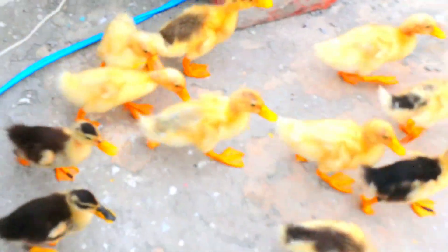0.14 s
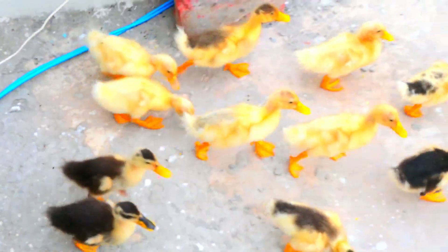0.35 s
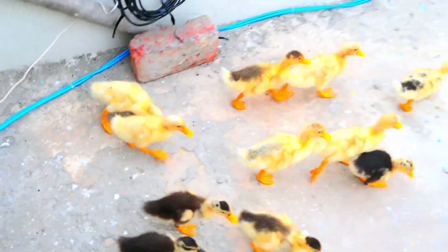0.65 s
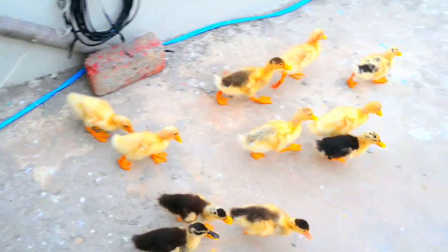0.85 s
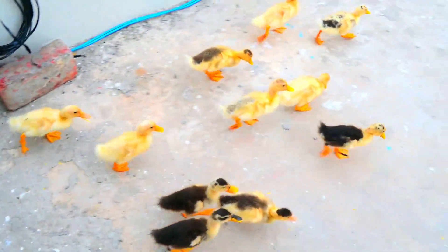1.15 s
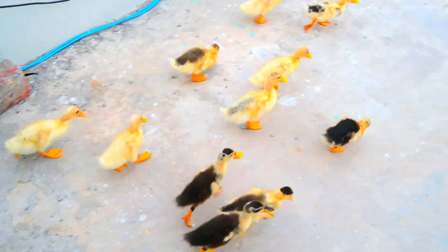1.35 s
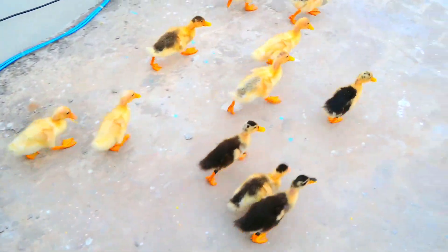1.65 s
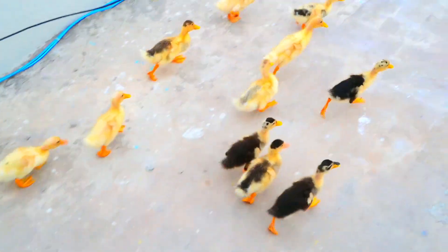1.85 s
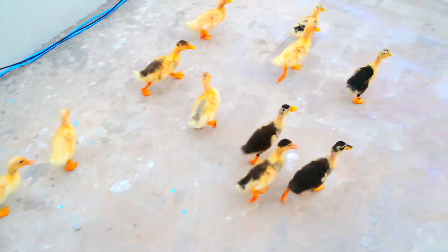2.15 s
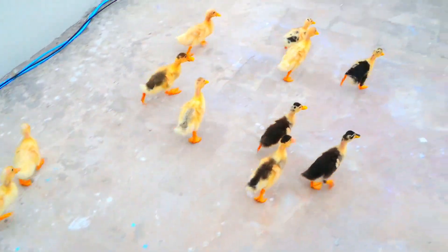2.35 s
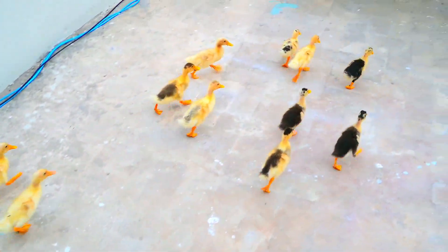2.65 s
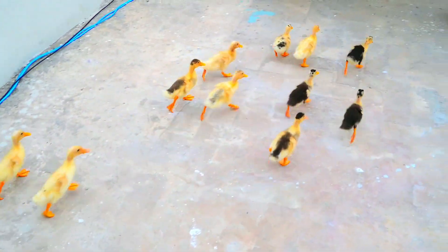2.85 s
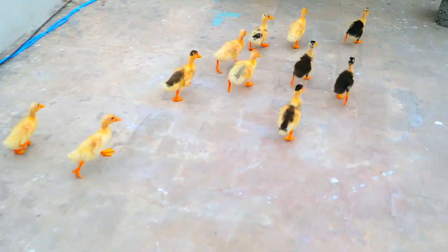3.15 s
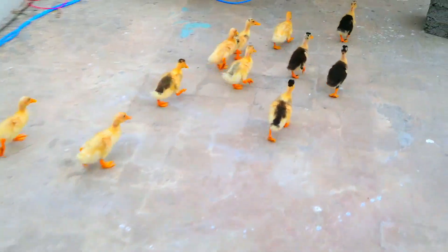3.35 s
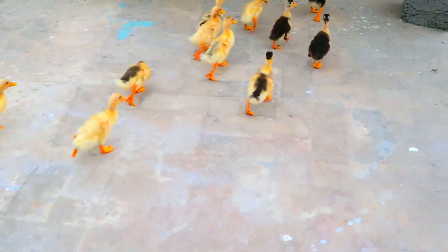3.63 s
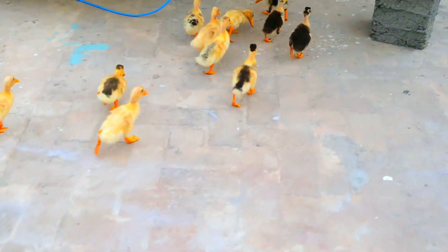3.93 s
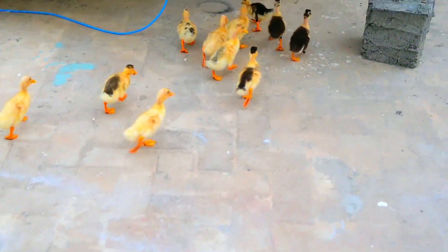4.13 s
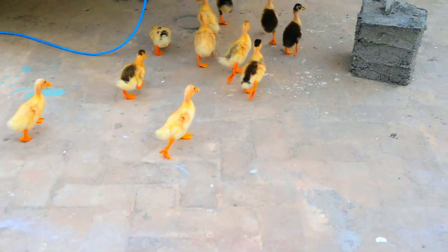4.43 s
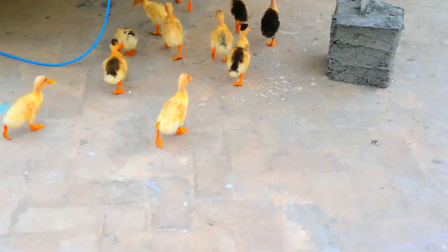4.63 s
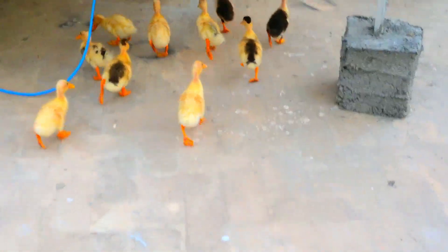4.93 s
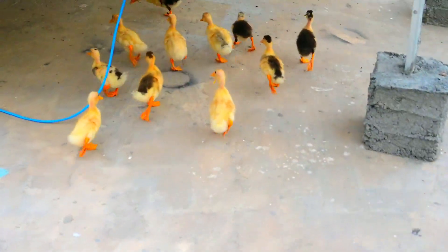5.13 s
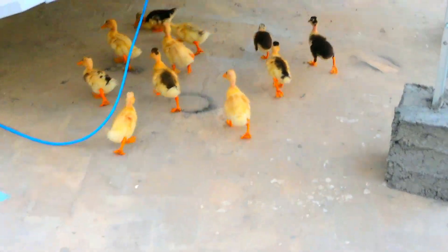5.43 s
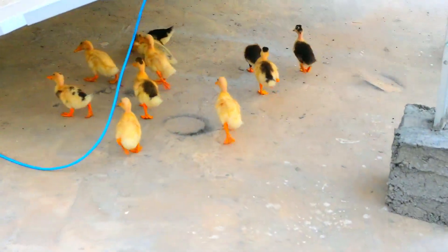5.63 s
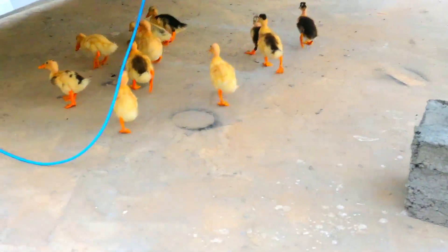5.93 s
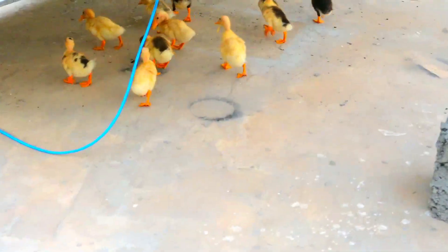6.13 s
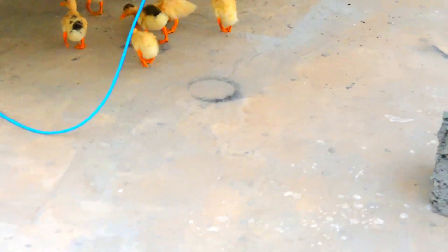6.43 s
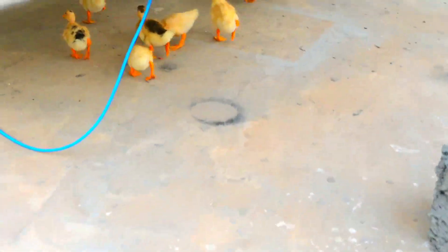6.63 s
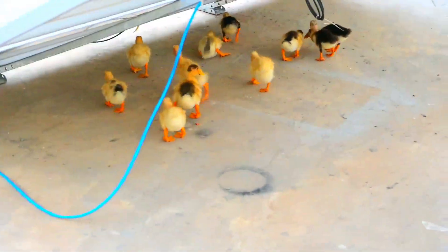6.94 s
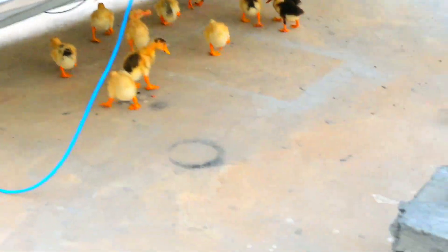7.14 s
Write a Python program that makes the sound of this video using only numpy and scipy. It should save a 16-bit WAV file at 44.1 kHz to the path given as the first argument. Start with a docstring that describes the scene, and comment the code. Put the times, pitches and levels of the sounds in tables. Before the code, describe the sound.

Outdoors on hard ground, a handheld stereo microphone picks up a lively duckling chorus, mostly high, quick cheeps, with grainy webbed footsteps and small clicks. After a hollow, raspy sandal drag, the calls thin out and strong wind hits left and right in abrupt low buffets and pops. The gusts weaken towards the end while the peeps return in a dense cluster with a touch of porch-like reverberation.

```python
"""A flock of ducklings peeps in a fast chorus: arched two-voice chirps, drawn-out whistles, softer neighbours.
Their feet patter over a concrete yard as grainy noise; sandals scuff as noise through hollow resonances.
Sparse decaying echoes answer from the walls. From about a third of the way in, gusts of wind buffet two
microphone ports as turbulence noise read at changing speed, with single hard pressure pulses.
Behind it lie quiet outdoor air, made of shaped noise, and briefly a far whine, made of a wavering sine."""
import sys
import numpy as np
from scipy import signal
from scipy.fft import rfft, irfft
from scipy.io import wavfile
from scipy.ndimage import uniform_filter1d, map_coordinates

SR = 44100
rng = np.random.default_rng(int(sys.argv[2]) if len(sys.argv) > 2 else 0)


def pcm_store(signal):
    """Save signal as 16-bit PCM."""
    levels = np.round(np.clip(np.atleast_2d(signal), -1, 1) * 32767)
    wavfile.write(sys.argv[1], SR, levels.astype(np.int16).T)


N = 321048
TIME = np.arange(N) / SR

# passband of throat and bill: hz, gain_db
BILL_BAND = [(2000, -3), (2600, -3), (3300, -3), (3800, -4), (4800, -14.5)]
# grit under small feet, spectrum: hz, relative_db
GRIT_SPECTRUM = [(1500, -25.5), (3500, 3), (5000, 5.5), (6500, 7.5), (8000, -1.5), (11000, -1.5),
                 (15500, -2)]


def amp(db):
    """Converts dB to a linear factor."""
    return 10 ** (np.asarray(db) / 20)


def evened(x):
    """Scales to rms 1."""
    return x / np.sqrt(np.mean(x ** 2) + 1e-20)


def read(points, hz):
    """Interpolates a table on a log-frequency axis."""
    f, value = np.transpose(points)
    return np.interp(np.log(hz + 1e-9), np.log(f), value)


def noise(points, size=N):
    """Noise of rms 1 with a given spectrum."""
    gain = amp(read(points, np.fft.rfftfreq(size, 1 / SR)))
    return evened(irfft(rfft(rng.standard_normal(size)) * gain, size))


def waver(rate_hz, size=N):
    """Smooth random curve, about unit spread, changing at up to rate_hz."""
    at = np.arange(size) * 2 * rate_hz / SR
    return map_coordinates(rng.standard_normal(int(at[-1]) + 3), [at], order=3, mode="mirror")


def panned(sound, pan_db):
    """Places a sound left (positive) or right (negative) by level difference, at constant power."""
    return amp([[pan_db / 2], [-pan_db / 2]]) * sound / np.sqrt(np.cosh(pan_db * np.log(10) / 20))


def add(mix, s, sound):
    """Mixes a sound in at time s, clipped to the ends of the mix."""
    start = round(s * SR)
    sound = sound[..., max(-start, 0):]
    part = mix[..., max(start, 0):][..., :sound.shape[-1]]
    part += sound[..., :part.shape[-1]]


def syrinx(hz, level, jitter=0.012, flutter_db=3.5, second_db=-33, third_db=-32, fourth_db=-48):
    """A nearly pure, unsteady whistle; overtones strengthen with the square of its relative level."""
    phase = 2 * np.pi * np.cumsum(hz * (1 + jitter * waver(300, len(hz)))) / SR
    strengths = amp(np.array([second_db, third_db, fourth_db]) + 2 * rng.standard_normal(3))
    overtones = sum(g * np.sin(k * phase) * (k * hz < SR / 2) for k, g in enumerate(strengths, 2))
    tone = np.sin(phase) + overtones * (level / level.max()) ** 2
    return tone * level * amp(flutter_db * waver(150, len(hz)))


def on_the_floor(sound, pan_db, bounce_db=-12, spread_s=.022, port_lag_s=.00003):
    """A call reaches each port with its own tiny lag; floor and walls add a few quick copies."""
    paths = np.zeros((2, int(spread_s * SR) + 20))
    for path in paths:
        path[rng.integers(1, len(path), size=6)] = amp(bounce_db) * rng.standard_normal(size=6) / np.sqrt(6)
        lag = int(min(abs(rng.standard_normal()) * 2 * port_lag_s * SR, 10))
        path[lag] = 1
    return panned(signal.fftconvolve(sound[None], paths, axes=1), pan_db)


def peeps(rest_hz=2000, arch=1.85, peep_db=-4.5, flare_db=7, flare_at=0.54, flare_width=0.23, loudest_db=-11):
    """Pitch arches up from rest and back in two voices; calls with a positive lean flare on the way down."""
    # nearest peeps: top_s, top_hz, half_length_s, level_db (before peep_db),
    # lean_db (level gained per half-length, held after flare_at)
    calls = [(.093, 3820, 0.034, -23, 1.5), (0.283, 2940, 0.044, -30.5, 2.5), (0.339, 3060, 0.02, -34, 37),
             (.405, 3007, 0.032, -22, 8), (0.475, 3280, 0.033, -22.5, 3.5), (0.505, 2974, 0.027, -25, 9),
             (.56, 3360, 0.029, -23.5, 18), (0.713, 3270, .027, -18, 9), (.732, 3280, 0.04, -18.5, 4.5),
             (.777, 2930, 0.03, -22.5, 2.5), (0.983, 2450, 0.035, -38, 12), (1.081, 3080, 0.051, -21, 3),
             (1.132, 3270, .02, -17, 4.5), (1.284, 3430, 0.03, -21, 5), (1.456, 2677, 0.036, -28, -1.5),
             (1.6, 3350, 0.041, -28, 2), (1.633, 3180, .021, -20, 6.5), (1.656, 3370, 0.042, -24.5, 2.5),
             (1.736, 3060, 0.028, -26, 2), (1.773, 2880, .026, -26, -10), (1.78, 4440, 0.046, -22, 19.5),
             (1.892, 3240, 0.039, -23.5, 4), (1.928, 3470, 0.036, -25.5, 2.5),
             (1.997, 3100, 0.039, -27.5, 3.5), (2.053, 3170, 0.036, -27.5, 12),
             (2.116, 3220, .036, -26, -3.5), (2.202, 2976, 0.034, -28, 2.5), (2.342, 2910, 0.031, -34, -4),
             (2.439, 2540, 0.035, -33.5, -12), (2.497, 2920, 0.033, -22.5, 7.5),
             (2.523, 3326, 0.024, -28.5, 8.5), (2.628, 3260, .03, -39, 0), (2.658, 3600, 0.029, -21.5, 7.5),
             (3.026, 3320, 0.038, -49, 12), (3.106, 2863, 0.019, -44.5, 5), (3.182, 3830, .038, -57.5, 7),
             (3.317, 2770, 0.025, -34, 4.5), (3.452, 2980, 0.029, -49, -19), (3.491, 3310, 0.035, -37, -6),
             (3.646, 3430, 0.041, -41.5, 23.5), (4.142, 3140, 0.027, -54, 8), (4.386, 3377, 0.056, -52, -6),
             (4.637, 3060, 0.039, -47.5, -15), (4.77, 3458, 0.026, -36.5, 5.5),
             (4.933, 3104, 0.024, -25, 6), (5.089, 3223, .033, -25.5, 2.5), (5.21, 3500, 0.037, -47, -3.5),
             (5.31, 3054, 0.058, -37.5, -1), (5.403, 3307, 0.031, -39, -5), (5.447, 3337, 0.038, -38, 5),
             (5.564, 3346, 0.028, -51.5, -10), (5.625, 3690, 0.021, -29.5, 9.5),
             (5.728, 3375, 0.034, -38.5, 13.5), (5.812, 3420, 0.045, -36, 7),
             (5.893, 3474, 0.034, -29, 0.5), (5.991, 3718, 0.033, -35.5, 2), (6.033, 3226, 0.03, -23, -3.5),
             (6.077, 3620, 0.027, -28.5, 12), (6.111, 2900, .032, -26.5, 7), (6.131, 3290, 0.028, -32, 6.5),
             (6.2, 3200, 0.039, -36, 0), (6.25, 3136, 0.026, -25.5, -1), (6.358, 3020, 0.027, -33.5, 0.5),
             (6.415, 3523, 0.034, -26, -1), (6.555, 2930, 0.025, -34.5, 6.5), (6.574, 3660, 0.04, -29.5, 5),
             (6.819, 3296, .035, -37.5, 0), (6.865, 3588, 0.023, -30.5, 2), (6.936, 3553, 0.026, -42, -4),
             (7.005, 3697, 0.033, -39, 20), (7.085, 3615, .034, -26, 0.5), (7.125, 4008, 0.027, -28, 28.5),
             (7.195, 3242, 0.035, -23.5, 0), (7.256, 3810, 0.028, -21, 13.5)]
    # place of the calling birds: s, left_right_db
    flock_pan = [(0, -2), (.4, -3.5), (.56, 2), (.73, -3.5), (1.3, -4.5), (1.64, 0), (1.85, -6.5),
                 (2.5, -3.5), (2.66, 3), (3, -7), (6, -5), (7.28, -2)]
    pan_scatter_db = 0.2
    # the other half of the syrinx: higher, receding in softer calls, varying between calls
    upper_ratio, upper_db_at_full, upper_db_per_db = 1.26, -19, 0.67
    full_voice_db, upper_scatter_db = -25, 11
    out = np.zeros((2, N))
    for s, top_hz, half_s, db, lean_db in calls:
        u = np.arange(-half_s, half_s, 1 / SR) / half_s
        hz = top_hz - (top_hz - rest_hz) * abs(u) ** arch
        swell = amp(peep_db + db) * (1 - u ** 2)
        flare = np.clip(lean_db / 10, 0, 1) * (np.exp(-((u - flare_at) / flare_width) ** 2) - .35)
        level = swell * amp(lean_db * np.minimum(u, flare_at) + flare_db * flare + read(BILL_BAND, hz))
        level = amp(loudest_db) * np.tanh(level / amp(loudest_db))  # a small bird can only get so loud
        upper_hz = hz * upper_ratio
        upper_db = upper_db_at_full + upper_db_per_db * (db - full_voice_db)
        upper_db += upper_scatter_db * rng.uniform(-1.3, 1)
        main_voice = syrinx(hz, level)
        upper_voice = syrinx(upper_hz, swell * amp(upper_db + read(BILL_BAND, upper_hz)))
        pan_db = np.interp(s, *np.transpose(flock_pan)) + pan_scatter_db * rng.standard_normal()
        add(out, s - half_s, on_the_floor(main_voice + upper_voice, pan_db))
    return out


def flock(near, count=330, under_db=-11, typical_hz=3200, typical_half_s=.032):
    """Many soft arched calls, their level following that of the near peeps."""
    out = np.zeros((2, N))
    for s, (pitch, length, side) in zip(np.linspace(0, N / SR, count), rng.standard_normal((count, 3))):
        half_s = typical_half_s * np.exp(0.14 * length)
        u = np.arange(-half_s, half_s, 1 / SR) / half_s
        hz = typical_hz * np.exp(.12 * pitch) * (1 - .36 * u ** 2)
        level = amp(read(BILL_BAND, hz)) * np.sqrt(1 - u ** 2 + 1e-9)
        add(out, s - 2 * half_s * rng.random(), panned(syrinx(hz, level), 6 * side))
    excitement = uniform_filter1d(abs(near).mean(0), size=5000)
    return amp(under_db) * evened(out) * excitement


def whistles(whistle_db=-5.3, pan_db=-4.5, sag_hz=148):
    """Longer, smoother calls whose pitch glides and sags in the middle, sag_hz below the ends' average."""
    # start_s, end_s, middle_hz, glide_hz (start to end), level_db (before whistle_db)
    drawn_calls = [(.279, 0.33, 2798, 241, -14), (1.018, 1.094, 3080, -46, -28),
                   (1.129, 1.192, 2610, -300, -16), (1.172, 1.217, 2378, 16, -25),
                   (1.339, 1.42, 2850, -260, -27), (2.364, 2.415, 2500, -800, -33.5),
                   (2.65, 2.785, 2604, -450, -31), (2.821, 2.975, 2570, -700, -43.5),
                   (2.96, 3.104, 2413, -480, -39.5), (3.336, 3.406, 2475, 137, -39),
                   (3.597, 3.705, 2690, -600, -34.5), (3.74, 3.81, 2450, -350, -58.5),
                   (4.573, 4.679, 2574, 389, -42.5), (4.861, 5.011, 2922, -450, -31.5),
                   (4.959, 5.045, 2688, 120, -36), (5.036, 5.128, 2430, -580, -32),
                   (5.179, 5.279, 2750, 300, -41.5), (5.881, 6.022, 2469, -160, -30)]
    out = np.zeros((2, N))
    for start, end, middle_hz, glide_hz, db in drawn_calls:
        u = np.linspace(-1, 1, round((end - start) * SR))
        hz = middle_hz + glide_hz / 2 * u + sag_hz * u ** 2
        hz = hz * (1 + .016 * waver(14, len(u)))  # slow bobbing
        level = amp(whistle_db + db) * (1 - u ** 2)
        tone = syrinx(hz, level, jitter=.003, flutter_db=3.5, second_db=-35.0, third_db=-37)
        add(out, start, on_the_floor(tone, pan_db, bounce_db=-15.5))
    return out


def feet(rustle_db=5.5, patter_db=-3, grain_db=5, pats_per_s=110, pat_s=0.018, tick_db=-3, tick_s=0.0044):
    """Webbed feet on grit: noise in sudden, quickly fading pats, with longer scrapes and sharp ticks."""
    # treble noise bed, nearly silent during the strong gusts: s, level_db (before patter_db and rustle_db)
    treble_bed = [(0.0, -62.5), (0.59, -59.5), (0.73, -68), (1.66, -69.5), (1.78, -68), (1.99, -67),
                  (3.57, -77.5), (3.71, -95.5), (4.66, -98), (4.8, -75), (4.99, -71.5), (5.66, -99),
                  (5.8, -63), (5.92, -61.5), (6.37, -65.5), (6.67, -57), (6.95, -71), (7.28, -54.5)]
    # foot scrapes: peak_s, half_length_s, level_db (before rustle_db)
    scrapes = [(0.113, 0.023, -56), (0.765, 0.012, -49), (1.12, 0.065, -67), (1.807, 0.092, -66),
               (4.933, 0.037, -52), (5.285, 0.012, -69), (5.822, 0.072, -55.5), (6.405, 0.013, -70),
               (7.271, 0.015, -58)]
    # claws and grit: start_s, level_db (before tick_db)
    ticks = [(0.093, -36), (0.174, -43.5), (0.5394, -36), (0.8734, -48), (0.9594, -47), (1.079, -45),
             (1.335, -48), (1.708, -64), (1.7918, -37), (3.1519, -52.5), (3.5429, -48), (5.1253, -48.5),
             (5.3252, -48.5), (6.6733, -39), (6.866, -42.5)]
    level = amp(patter_db + np.interp(TIME, *np.transpose(treble_bed)))
    for s, half_s, db in scrapes:
        level = level + amp(db) / (1 + ((TIME - s) / half_s) ** 4)
    pats = (rng.random(N) < pats_per_s / SR) * amp(grain_db * np.minimum(rng.exponential(1, N), 3))
    clumps = evened(.5 + signal.lfilter([1], [1, -np.exp(-1 / (pat_s * SR))], pats))
    out = np.array([noise(GRIT_SPECTRUM), noise(GRIT_SPECTRUM)]) * clumps * level * amp(rustle_db)
    t = np.arange(4096) / SR
    fade = np.exp(-t / tick_s) + 0.078 * np.exp(-t / 0.048)  # crack and short echoing tail
    for s, db in ticks:
        grit = np.array([noise(GRIT_SPECTRUM, len(t)), noise(GRIT_SPECTRUM, len(t))])
        add(out, s, amp(db + tick_db) * fade * grit)
    return out


def scuffs(grain_db=3):
    """A sandal sole drags over concrete: a grainy rasp through a few hollow resonances."""
    # peak_s, rise_s, fall_s (Gaussian widths), level_db, left_right_db
    strokes = [(.005, 0.024, 0.029, -39, 0.5), (.438, 0.02, 0.013, -43.5, -2), (1.48, 0.029, 0.033, -54, 2),
               (2.592, 0.0072, 0.011, -29.5, 2.5), (2.624, 0.0055, 0.02, -25.5, 2),
               (2.657, 0.0098, 0.022, -25.5, -3.5), (6.227, 0.016, 0.032, -40, -8.5),
               (6.408, 0.016, 0.02, -33, -6.5)]
    # rasp spectrum: hz, relative_db
    sole = [(300, -31.5), (650, -17), (900, -2.5), (1200, -0.5), (1750, 0), (2200, -10), (3500, -9.5),
            (4600, -36.5), (8000, -48), (15000, -64)]
    # hollow resonances: centre_hz, width_hz, boost_db
    sole_modes = [(940, 38, 1.5), (1100, 51, 4.6), (1390, 49, 1.16), (1727, 32, 3.8), (2010, 57, 8)]
    hz, out = np.fft.rfftfreq(N, 1 / SR), np.zeros((2, N))
    colour_db = read(sole, hz) + sum(db / (1 + (2 * (hz - f) / width) ** 2) for f, width, db in sole_modes)
    grains = rng.standard_normal(N) * amp(grain_db * waver(300))
    rasp = evened(irfft(rfft(grains) * amp(colour_db), N))
    for s, rise_s, fall_s, db, pan_db in strokes:
        stroke = np.exp(-.5 * ((TIME - s) / np.where(TIME < s, rise_s, fall_s)) ** 2)
        out += panned(rasp * stroke * amp(db), pan_db)
    return out


def airflow(port):
    """Level (dB, before wind_db) and rumble centre (Hz) at one port, from its gusts and the breeze."""
    # start_s, length_s, mid_level_db, mid_centre_hz, port (0 left, 1 right)
    gust_list = [(2.523, .04, -46.5, 140.7, 1), (2.732, 0.051, -23, 299, 1), (2.806, 0.12, -28, 180.9, 1),
                 (2.991, 0.014, -35, 100.1, 1), (3.435, 0.036, -21.5, 251, 1), (3.505, .015, -21, 112.7, 1),
                 (3.479, 0.099, -21, 258.6, 0), (3.661, .08, -19, 430.7, 0),
                 (3.699, 0.024, -24.5, 381.1, 1), (3.809, 0.061, -25.5, 329.8, 0),
                 (3.854, 0.17, -26, 480.5, 1), (3.905, 0.037, -13, 697, 1), (3.923, 0.059, -21, 579.5, 0),
                 (4.179, .03, -16, 906, 0), (4.228, 0.0429, -18, 752.7, 0), (4.278, 0.057, -16.5, 1179, 0),
                 (4.347, 0.14, -21.5, 658.5, 0), (4.598, 0.035, -37.5, 478, 0),
                 (4.672, 0.009, -18, 784.6, 1), (4.707, 0.034, -17.5, 499.7, 1),
                 (4.757, 0.2, -30.5, 182.3, 0), (4.924, 0.053, -21, 399, 0), (4.991, 0.17, -23, 530.5, 0),
                 (5.192, 0.068, -30, 419.1, 0), (5.273, 0.0079, -23.5, 658.4, 0),
                 (5.314, .115, -20, 629.2, 0), (5.469, 0.041, -21.5, 749, 0),
                 (5.532, 0.12, -35.5, 379.9, 0), (5.604, 0.053, -39, 316.9, 1),
                 (5.87, .11, -36.5, 145.7, 1), (6.376, 0.11, -44, 401.7, 1),
                 (6.569, 0.019, -36.5, 268.8, 1), (6.593, 0.06, -41.5, 179.6, 0),
                 (6.871, 0.0042, -32.5, 1263, 0), (6.886, 0.012, -23, 946.9, 0),
                 (7.147, .035, -32, 280.5, 0), (7.246, 0.022, -28, 185.6, 1),
                 (7.274, 0.011, -19.5, 616.3, 1)]
    # air between gusts: s, left_db, right_db
    breeze_levels = [(2.25, -85.5, -72), (2.881, -79.5, -40.5), (3.15, -82, -75), (3.359, -69.5, -71),
                     (3.551, -32, -46.5), (3.9, -34, -36.5), (4.1, -60, -62), (4.55, -54, -68),
                     (4.74, -37, -39), (5.001, -31, -67.5), (5.45, -33, -71.5), (5.901, -47, -41),
                     (6.2, -69.5, -63), (6.752, -69.5, -71), (7.28, -50.5, -55.5)]
    breeze_hz, breeze_at_db = 170.77, -38  # rumble centre at this level
    # a gust hits at once, sags while it lasts and drops away
    rise_db_per_s, sag_db, fall_db_per_s = 2501, 2.5, 803.5
    # weaker air builds up ahead of it and trails behind
    wake_db, wake_rise_db_per_s, wake_fall_db_per_s = -17, 332, 170.5
    rumble_db_per_octave = 17  # slackening air lowers the rumble, by one octave at most
    own_gusts = [gust for gust in gust_list if round(gust[-1]) == port]
    start, length, db, hz, _ = np.transpose(own_gusts)[:, :, None]
    t = TIME[::40]
    early, late = np.maximum(start - t, 0), np.maximum(t - start - length, 0)
    core = -rise_db_per_s * early - fall_db_per_s * late
    wake = wake_db - wake_rise_db_per_s * early - wake_fall_db_per_s * late
    shape = np.maximum(core, wake) + sag_db * (.5 - np.clip((t - start) / length, 0, 1))
    breeze = np.transpose(breeze_levels)
    breeze_db = np.interp(t, breeze[0], breeze[1 + port], left=-120)
    power = amp(np.vstack([db + shape, breeze_db])) ** 2
    octaves = np.vstack([shape, breeze_db - breeze_at_db]) / rumble_db_per_octave
    centre_hz = np.vstack([hz, [breeze_hz]]) * 2 ** np.maximum(octaves, -1)
    level_db = 10 * np.log10(power.sum(0))
    return np.interp(TIME, t, level_db), np.interp(TIME, t, np.average(centre_hz, 0, power))


def wind(flow, lump_db=4.5, surge=.11, wind_db=-1.5, lumps_per_s=150, lump_s=0.006):
    """Eddies sweep past one port in lumps that hit fast and fade; faster air is louder and higher."""
    # turbulence spectrum: multiple_of_centre_hz, relative_db
    eddies = [(.05, -8), (.4, 2), (1, 3), (1.7, -2.5), (2.6, -9.5), (4, -31.5), (6.5, -70), (9, -84.5)]
    db, centre_hz = flow
    hits = (rng.random(N) < lumps_per_s / SR) * rng.uniform(0.4805, 1, N)
    gust = uniform_filter1d(signal.lfilter([1], [1, -np.exp(-1 / (lump_s * SR))], hits), size=50)
    gust = np.minimum(evened(gust - gust.mean()), 2)
    hz = centre_hz * np.exp(surge * (gust - 1))
    stored_hz = 300  # centre of the stored pattern, read at a varying speed
    pattern = noise([(k * stored_hz, level) for k, level in eddies])
    pressure = map_coordinates(pattern, [np.cumsum(hz) / stored_hz], order=3, mode="wrap") * amp(lump_db * gust)
    pressure /= np.sqrt(uniform_filter1d(pressure ** 2, size=1800) + 1e-9)  # level over 41 ms
    return pressure * amp(wind_db + db)


def buffets(flows, pop_db=-1.5, width_cycles=0.17):
    """A hard eddy hits one port: one push or pull with a rebound on each side, shorter in faster air."""
    # s, peak_db (before pop_db), port (0 left, 1 right)
    hard_eddies = [(2.737, -8, 1), (2.849, -13.5, 1), (3.48, -8.5, 0), (3.544, -6.5, 0), (3.673, -4, 0),
                   (3.734, 2.5, 0), (3.894, -3.5, 1), (3.908, -4, 0), (3.919, -15, 1), (3.946, -5, 0),
                   (4.241, -5, 0), (4.453, -1.5, 0), (4.727, -2, 1), (4.995, -4.5, 0), (5.136, 0, 0),
                   (5.274, -8, 0), (5.501, -6, 0), (6.87, -15, 0), (6.897, -8, 0)]
    out, t = np.zeros((2, N)), np.arange(-.01, .01, 1 / SR)
    for s, db, port in hard_eddies:
        _, centre_hz = flows[round(port)]
        u = t * centre_hz[round(s * SR)] / width_cycles
        peak = rng.choice([-1, 1]) * amp(db + pop_db)
        add(out[round(port)], s + t[0], peak * (1 - u ** 2) * np.exp(-u ** 2 / 2))
    return out


def distance(air_db=-68):
    """Quiet outdoor air, partly shared by both sides, and a far, wavering sine whine."""
    # whine: s, pitch_hz, rms_db (both before wavering)
    whine_track = [(1.55, 553, -83), (1.87, 607, -72.5), (2.13, 638, -67.5), (2.31, 625, -68.5),
                   (2.36, 598, -72)]
    # air spectrum: hz, relative_db
    air = [(20, -16), (55, 0), (100, -1.5), (200, -9), (500, -11), (1000, -12), (2000, -10), (4000, -47.5),
           (8000, -62.5), (16000, -54)]
    s, hz, db = np.transpose(whine_track)
    phase = 2 * np.pi * np.cumsum(np.interp(TIME, s, hz) * (1 + .005 * waver(25))) / SR
    whine_db = np.interp(TIME, s, db, left=-120, right=-120) + 2 * waver(12)
    whine = np.sqrt(2) * np.sin(phase) * amp(whine_db)
    return whine + amp(air_db) * evened(noise(air) + 0.49 * np.array([noise(air), noise(air)]))


def yard(x):
    """Sparse echoes from walls and floor, each band dying at its own speed."""
    # hz, t60_s
    decay = [(200, 0.58), (1000, 0.51), (2000, 0.36), (3200, 0.22), (6000, 0.19), (14000, 0.083)]
    taps = np.zeros((2, SR))
    at = np.arange(200, SR - 20, 20)
    np.put_along_axis(taps, at + rng.integers(0, 20, (2, len(at))), rng.choice([-1., 1.], (2, len(at))), 1)
    hz, t, z = signal.stft(taps, SR, nperseg=256)
    t60 = read(decay, hz)[:, None]
    tail = signal.istft(z * amp(-60 * t / t60), SR, nperseg=256)[1]
    return signal.fftconvolve(x, tail / np.linalg.norm(tail[0]), axes=1)[:, :N]


def scene(peep_room_db=-16, porch_db=5, scuff_room_db=-10):
    """Mixes the layers; the calls grow more echoing as the flock walks in under the porch."""
    near, steps = peeps(), scuffs()
    birds = near + flock(near) + whistles()
    wet = amp(peep_room_db + porch_db * np.clip(TIME - 4.8, 0, 1))
    echoes = yard(birds * wet + steps * amp(scuff_room_db))
    left, right = airflow(0), airflow(1)
    gusts = np.array([wind(left), wind(right, surge=.12)]) + buffets([left, right])
    gusts = .9 * np.tanh(gusts / .9)  # the hardest gusts overload the capsules
    return birds + echoes + steps + feet() + gusts + distance()


def record(dry, edge_hz=15900):
    """Band limit: a linear-phase low-pass at edge_hz."""
    lowpass = signal.firwin(511, edge_hz, window=("kaiser", 9), fs=SR)
    return signal.oaconvolve(dry, lowpass[None], "same")


dry = scene()
out = record(dry)
pcm_store(out)
```